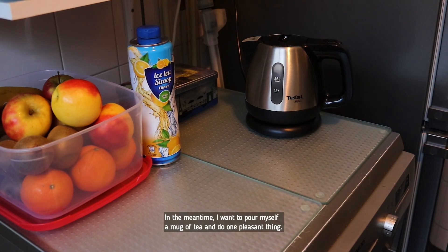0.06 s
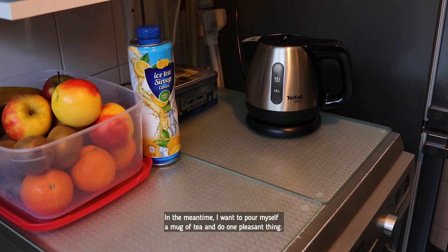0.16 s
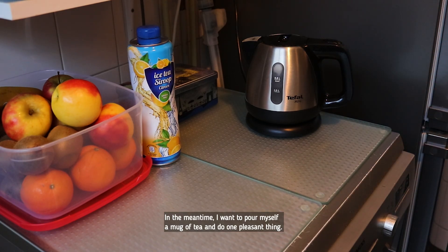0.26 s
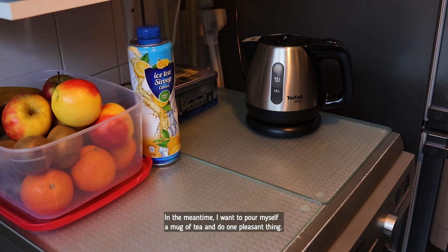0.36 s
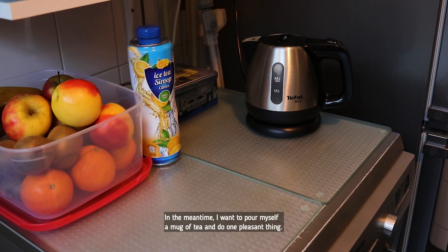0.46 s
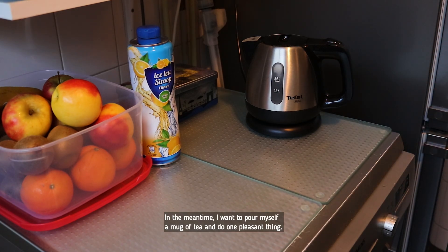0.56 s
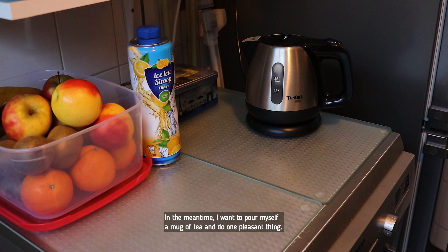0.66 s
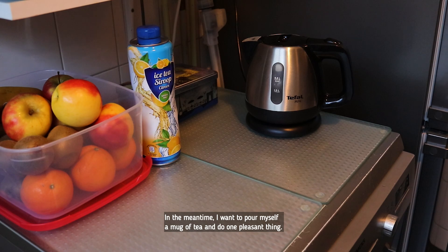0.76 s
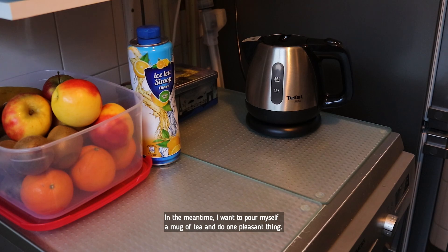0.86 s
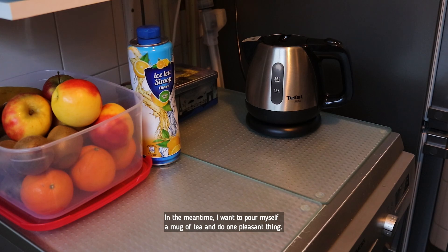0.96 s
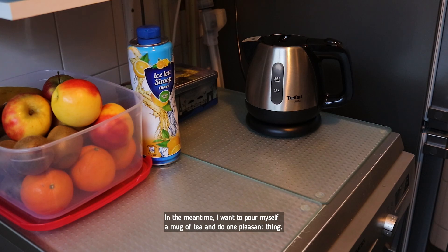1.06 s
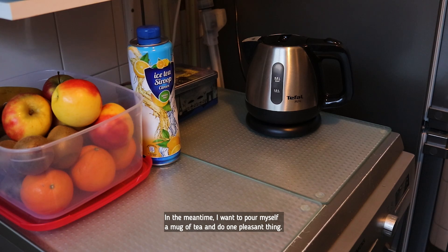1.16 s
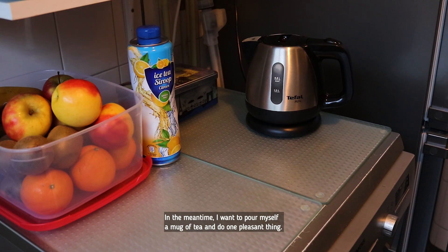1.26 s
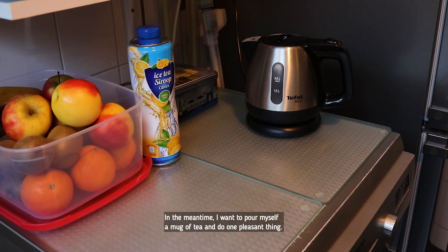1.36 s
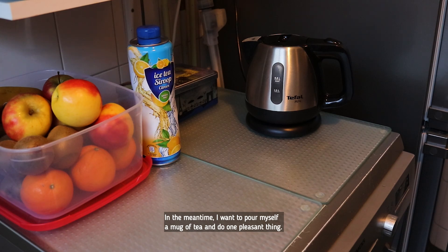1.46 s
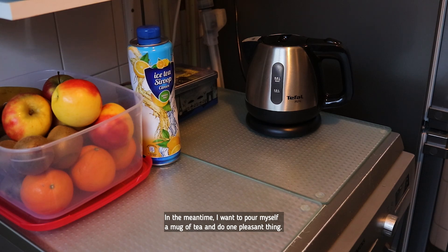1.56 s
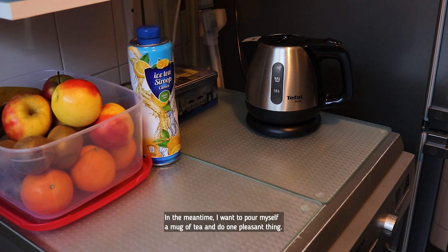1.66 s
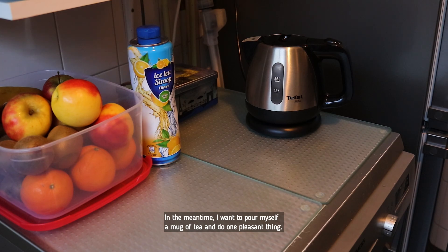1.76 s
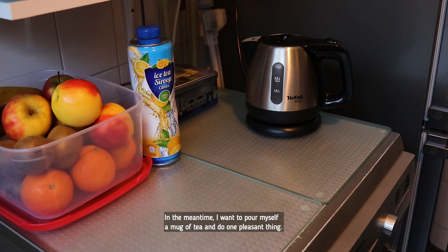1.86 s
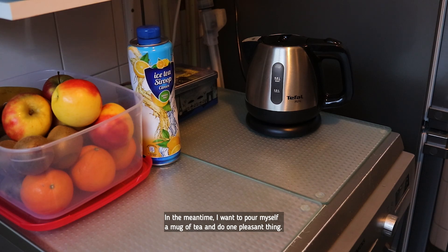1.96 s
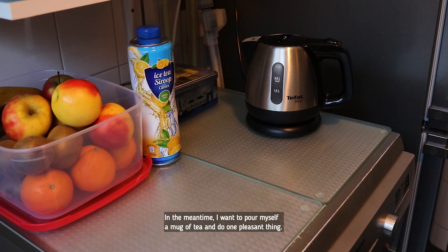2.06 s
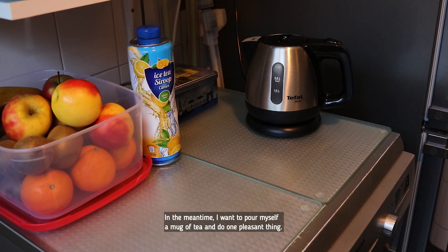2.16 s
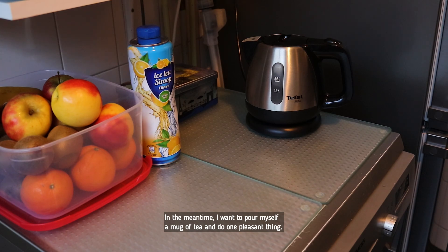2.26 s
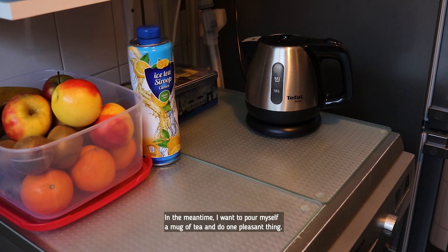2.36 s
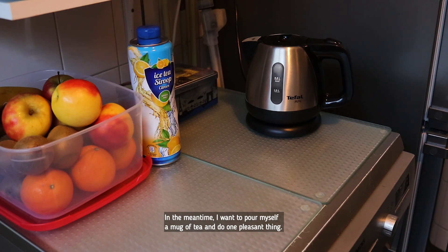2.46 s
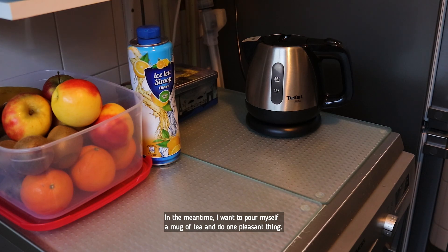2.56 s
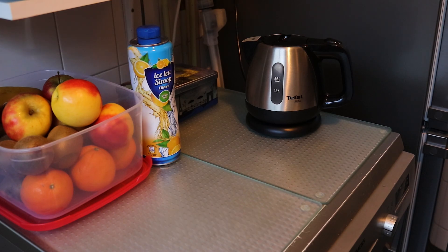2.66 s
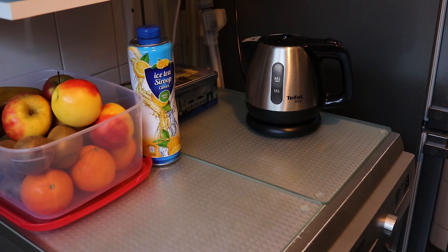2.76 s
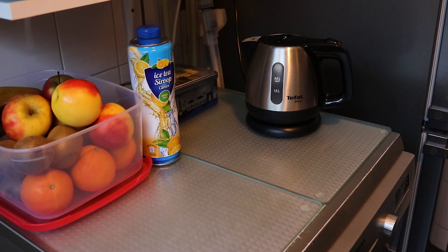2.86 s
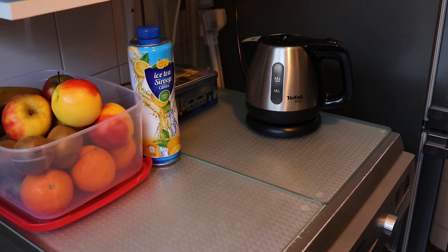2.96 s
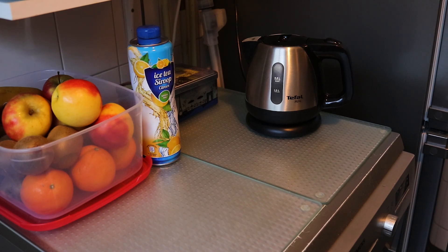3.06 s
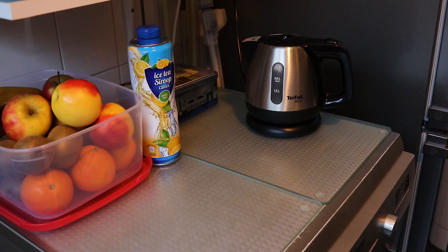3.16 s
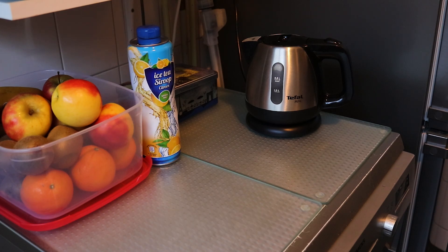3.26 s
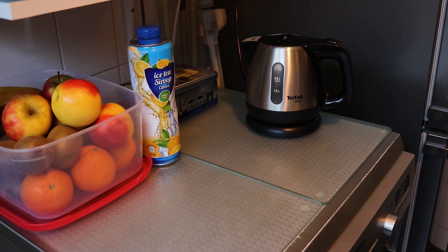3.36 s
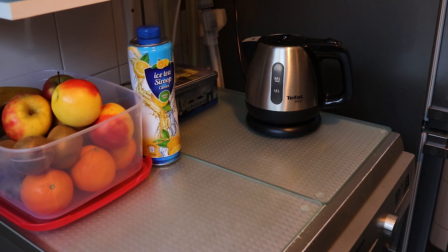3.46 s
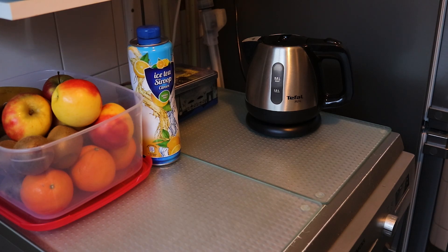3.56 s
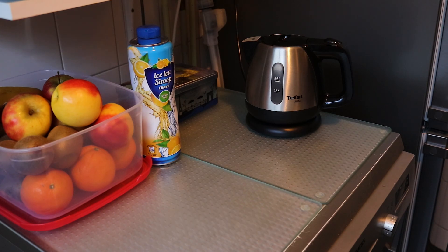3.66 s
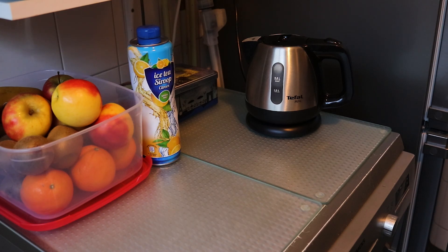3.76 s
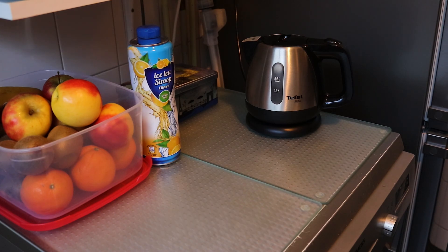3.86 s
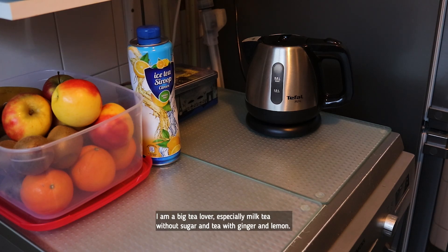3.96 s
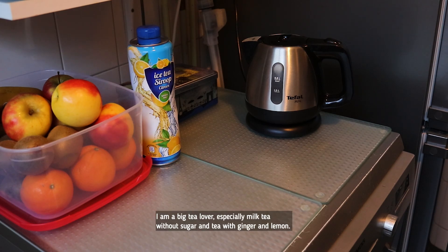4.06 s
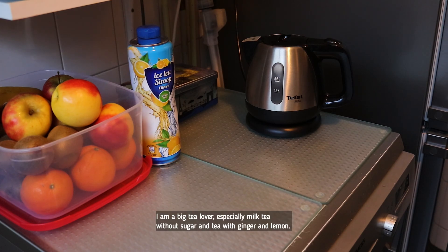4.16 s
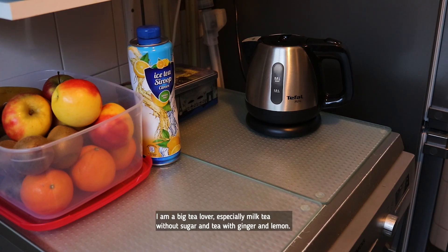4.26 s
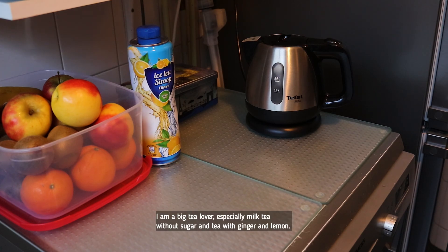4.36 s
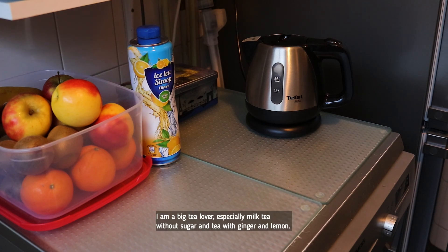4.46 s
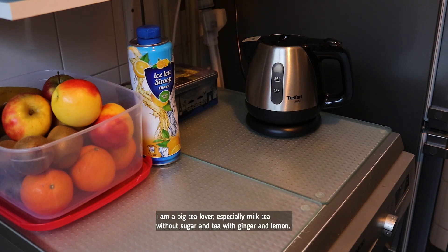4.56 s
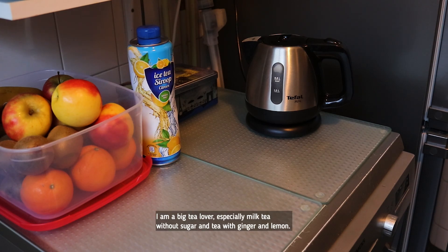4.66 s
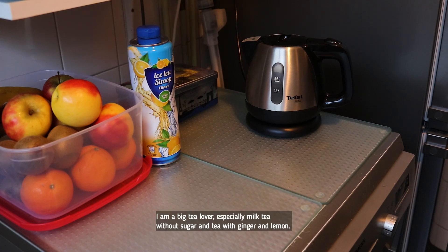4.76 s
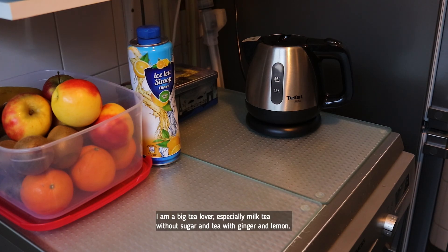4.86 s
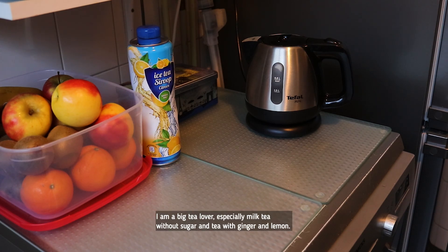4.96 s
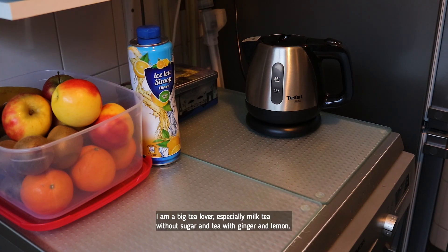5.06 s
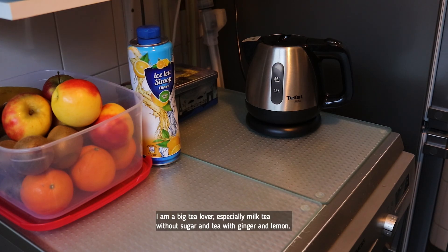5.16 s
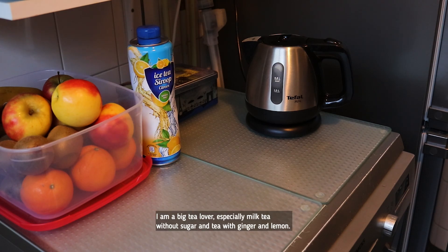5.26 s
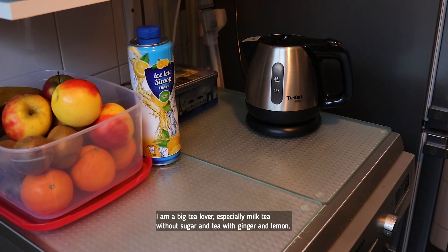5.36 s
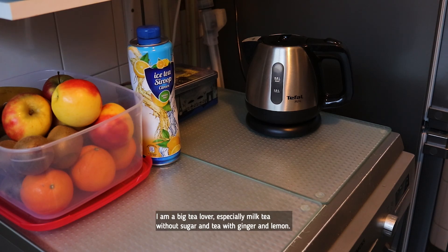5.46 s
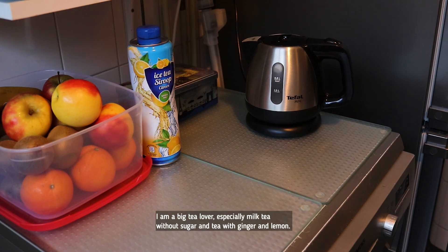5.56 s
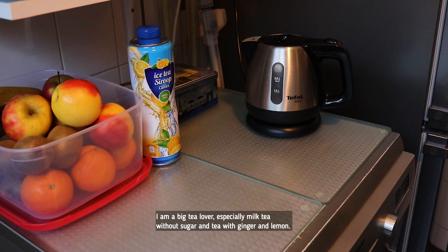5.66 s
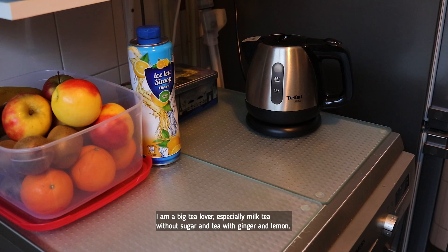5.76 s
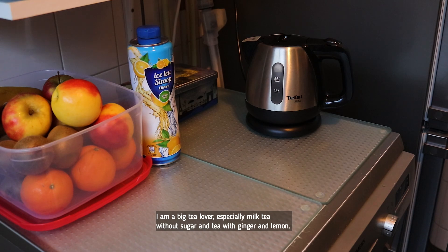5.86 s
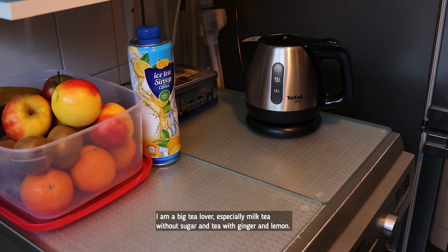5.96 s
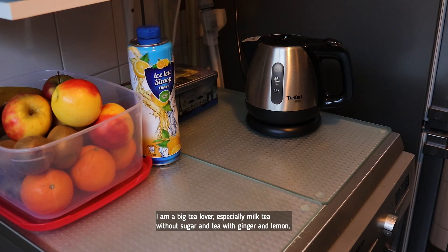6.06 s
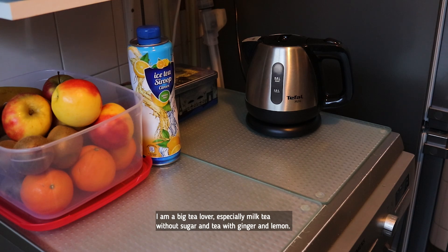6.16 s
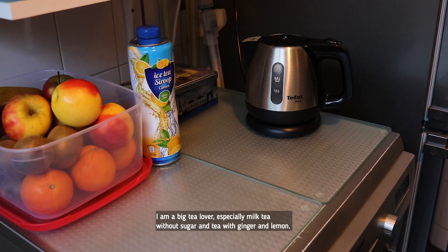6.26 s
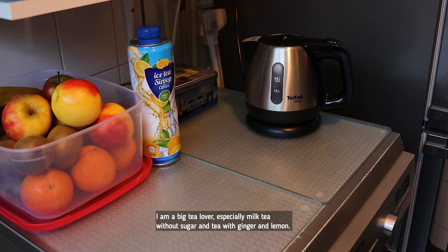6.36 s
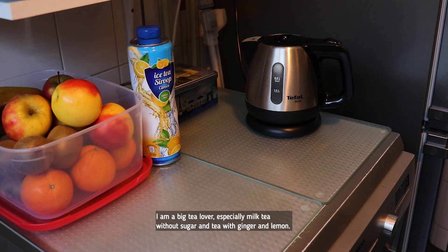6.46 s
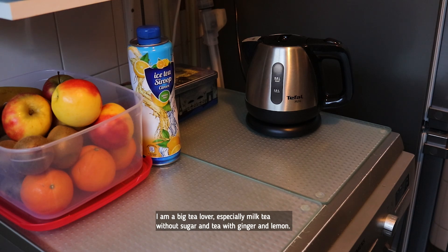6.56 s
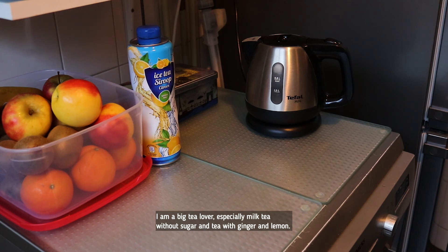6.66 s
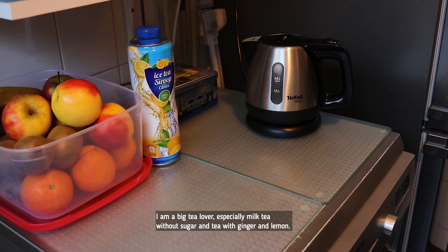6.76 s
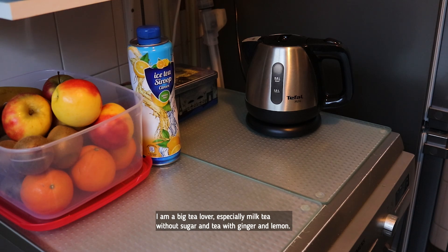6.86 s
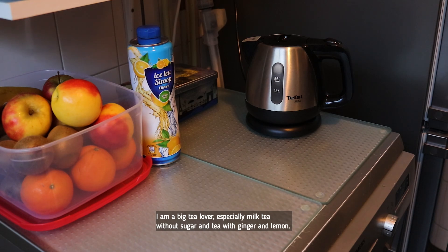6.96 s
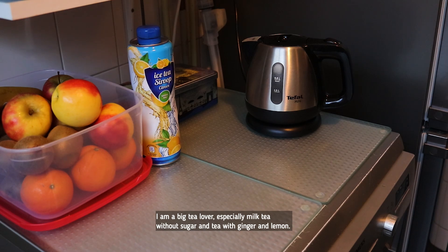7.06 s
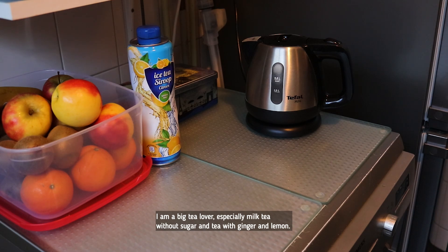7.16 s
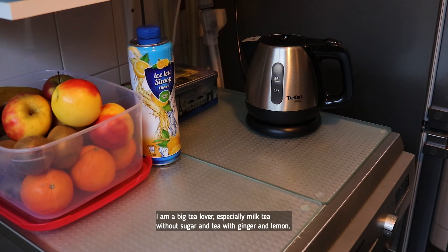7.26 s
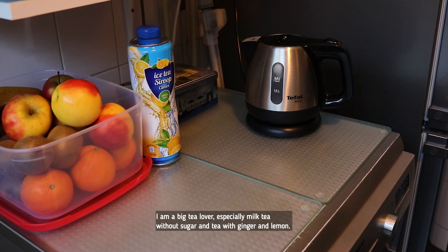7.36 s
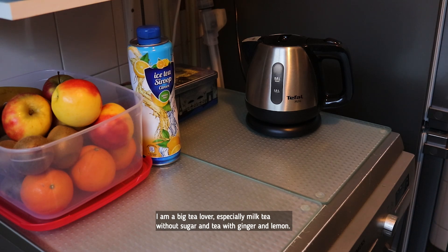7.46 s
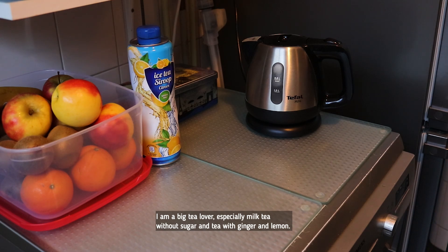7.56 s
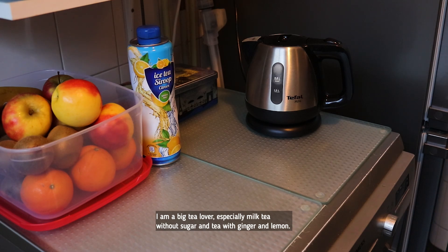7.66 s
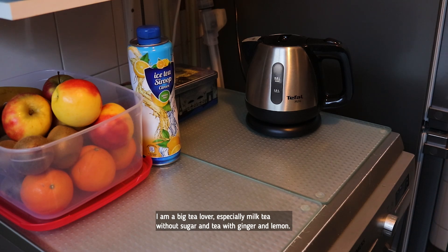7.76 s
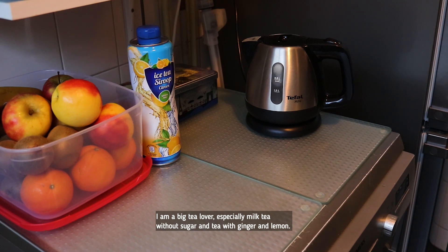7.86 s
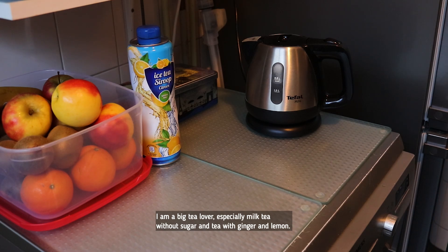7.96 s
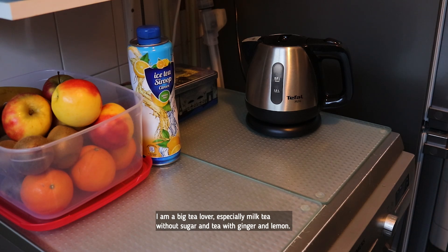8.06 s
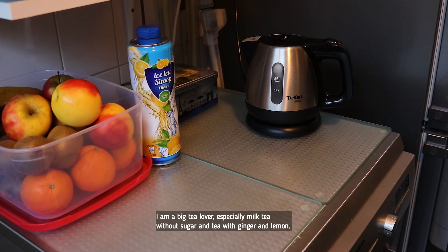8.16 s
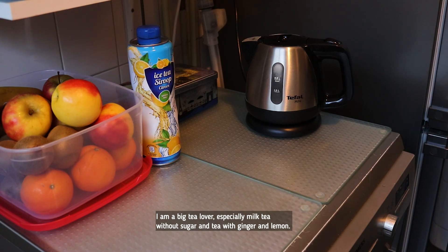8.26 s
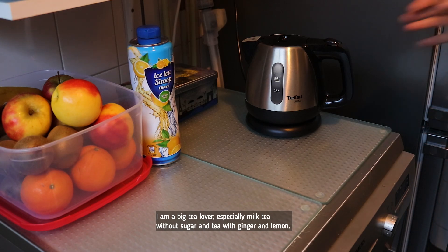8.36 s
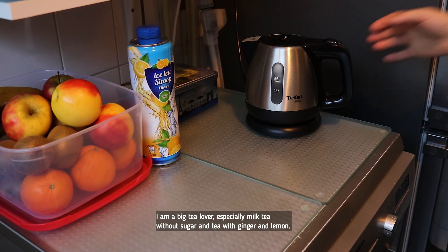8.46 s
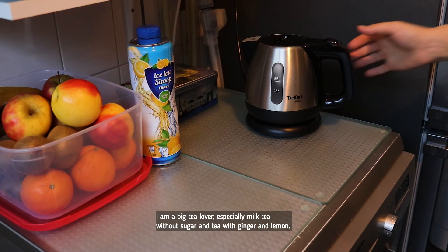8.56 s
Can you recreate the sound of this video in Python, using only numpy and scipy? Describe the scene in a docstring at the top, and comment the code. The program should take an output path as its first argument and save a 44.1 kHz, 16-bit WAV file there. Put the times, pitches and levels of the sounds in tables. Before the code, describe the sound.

From 0 s a steel electric kettle boils hard: dense, muffled bubbling around the low mids, with irregular round thumps, a deep watery churn and a light fizz of spray. At about 0.36 s the switch snaps off, a very loud, bright, dry clack in two almost fused steps, with a short knock, faint steel ring and tiled-room tail. Stored heat keeps the boil strong until about 2 s, then it sinks steadily; surface fizz fades sooner. Throughout, wet plinks and tiny hot-steel ticks scatter irregularly. Crisp cooling clicks fall near 1.0, 2.9, 5.4, 7.0 and 8.2 s, those at 5.4 and 8.2 clearest, with slight pings. By 6 to 8.5 s only soft, sparser blubs and ticks remain over a barely audible airy steam note, quiet room tone and faint hiss. Close, centred pickup with a short, lively kitchen reverberation.

```python
"""A steel electric kettle boils hard on a kitchen counter; its switch snaps off early and the boil slowly dies away.
Vapour bubbles thump the kettle's body as they collapse, and the churning water rumbles below.
Bursting bubbles ring the spout and plink, spray and hot steel tick, and steam adds a faint airy note.
The cooling kettle clicks five times. A tiled kitchen, made of fading noise, answers all of these except
the churning and the steam; a quiet room and a faint hiss lie underneath."""
import sys
import numpy as np
from scipy import signal
from scipy.fft import rfft, irfft
from scipy.io import wavfile

SR = 44100
rng = np.random.default_rng(int(sys.argv[2]) if len(sys.argv) > 2 else 0)


def waveform_to_disk(signal):
    """Save audio, clipped to [-1, 1], as 16-bit WAV at the path in sys.argv[1]."""
    frames = np.transpose(np.atleast_2d(signal))
    scaled = np.clip(frames, -1, 1) * 32767
    samples = np.round(scaled).astype(np.int16)
    wavfile.write(sys.argv[1], SR, samples)


N = 379701
T = np.arange(N) / SR  # time of every sample, in seconds


def amp(db):
    """Turns decibels into a gain."""
    return 10 ** (np.asarray(db) / 20)


def unit(x):
    """Scales a sound to an rms (average strength) of 1."""
    return x / np.sqrt(np.mean(x ** 2) + 1e-20)


def peaked(x):
    """Scales a sound so that its highest peak is 1."""
    return x / abs(x).max()


def read(points, hz):
    """Reads a table of values by pitch, joining its points on a log-frequency axis."""
    f, value = np.transpose(points)
    return np.interp(np.log(hz + 1), np.log(f + 1), value)


def add(mix, start_s, sound):
    """Mixes a sound in at its start time."""
    part = mix[max(round(start_s * SR), 0):][:len(sound)]
    part += sound[:len(part)]


def colour(x, spectrum, tilt_db=0, size=4096):
    """Filters with the given tone colour, tilted by so many dB an octave, without sounding early."""
    hz = abs(np.fft.fftfreq(size, 1 / SR))
    level_db = read(spectrum, hz) + tilt_db * np.log2(hz / 1000 + .1)
    log_gain = np.log(amp(level_db))
    # minimum phase: the filter answers as promptly as its colour allows
    response = np.fft.ifft(np.exp(np.conj(signal.hilbert(log_gain)))).real
    return signal.oaconvolve(x, response[:size // 2])[:len(x)]


def ring(modes, size=22050):
    """Adds up dying sine notes; fade_s is the time a note takes to fall by 60 dB."""
    t = T[:size]
    out = np.zeros(size)
    for pitch_hz, fade_s, level_db in modes:
        fade = np.exp(-np.log(1000) * t / fade_s)
        out += amp(level_db) * fade * np.sin(2 * np.pi * pitch_hz * t)
    return out


def blows(per_s, spread_db, limit):
    """Random pushes of either sign: many small, a few large."""
    when, sign, chance = rng.random((int(per_s * N / SR), 3)).T
    strength_db = spread_db * np.minimum(-np.log(1 - chance), limit)
    push = np.sign(sign - .5) * amp(strength_db)
    return np.bincount((when * N).astype(int), push, N)


def surge(depth_db, clump_s):
    """Bubbles come in clumps: a gain of rms 1 that wanders at random within bounds."""
    knots = rng.standard_normal(2000)
    wander = np.interp(T / clump_s, np.arange(len(knots)), knots)
    return unit(amp(depth_db * np.tanh(wander)))


def burst(decay_s, scatter, size=2048):
    """A sharp push followed by its scatter off the counter and nearby things, of energy 1."""
    scattered = scatter * rng.standard_normal(size) * np.exp(-T[:size] / decay_s)
    x = scattered + signal.unit_impulse(size)
    return x / np.linalg.norm(x)


def bubble(hz, cycles, glide, size=2048):
    """A bubble swells for some cycles of its note, then dies; a glide above 0 makes its pitch rise."""
    u = T[:size] * hz / cycles  # reaches 1 when the note is loudest
    pitch_hz = hz * (1 + glide * np.tanh(u - 1))
    return u * np.exp(1 - u) * np.sin(2 * np.pi * np.cumsum(pitch_hz) / SR)


# the heater cuts out (s)
SWITCH_OFF_S = 0.35


def cooling(hold_s, fade_db_per_s):
    """Gain of the boil: stored heat sustains it for a while after the switch trips, then it falls steadily."""
    return amp(-fade_db_per_s * np.maximum(T - SWITCH_OFF_S - hold_s, 0))


# the bubbling before it fades: rms level (dB), how long stored heat holds it (s), its fall after that (dB/s)
BOIL_DB, BOIL_HOLD_S, BOIL_FADE_DB_PER_S = -46.5, 1.59, 1.47
# what one collapsing bubble sounds like through the body: (pitch_hz, level_db)
BODY_COLOUR = [(200, -38), (262, -19), (290, -4), (318, -6.5), (355, -1.5), (455, -1), (485, -1.5),
               (520, 2.5), (600, -4.5), (720, -8.5), (800, -9.5), (875, -10.5), (1000, -23), (1500, -23.5),
               (3000, -63)]


def crowd():
    """Countless small vapour bubbles collapse over the hot plate and shake the body."""
    collapses = blows(800, 3.14, 2.9) * surge(2.5, clump_s=.055)
    bubbles = colour(collapses, BODY_COLOUR)
    in_room = unit(bubbles + amp(-8.0) * kitchen(bubbles))
    return amp(BOIL_DB) * cooling(BOIL_HOLD_S, BOIL_FADE_DB_PER_S) * in_room


# each large collapse also knocks a higher note of the body: pitch, and level against the main note
UPPER_HZ, UPPER_DB = 860, -18
# large vapour bubbles that collapse, levels before a slight final cut: (start_s, level_db, pitch_hz)
LARGE_BUBBLES = [(0.101, -32.5, 420), (.197, -30, 525), (.212, -29.5, 440), (.261, -31.5, 424),
                 (.326, -34, 480), (.466, -44, 484), (0.561, -33, 430), (0.57, -36.5, 480),
                 (.589, -39, 486), (0.731, -32, 497), (0.76, -30.5, 520), (0.779, -30, 515),
                 (.791, -34, 447), (.828, -35, 474), (.882, -35, 454), (1.11, -33, 470), (1.232, -35, 405),
                 (1.26, -32, 510), (1.316, -37, 465), (1.424, -36.5, 536), (1.494, -40, 540),
                 (1.574, -36, 425), (1.732, -31.5, 453), (1.863, -37, 480), (2.067, -44, 476),
                 (2.232, -37, 505), (2.344, -36, 433), (2.363, -32, 516), (2.393, -30.5, 480),
                 (2.492, -30, 448), (2.619, -38, 470), (2.666, -38, 487), (2.685, -34, 430),
                 (2.808, -35.5, 473), (2.864, -34.5, 450), (2.922, -34, 452), (3.031, -33, 546),
                 (3.192, -34, 448), (3.267, -37.5, 486), (3.432, -35.5, 494), (3.453, -39, 483),
                 (3.567, -35, 403), (3.588, -36, 537), (3.606, -33.5, 526), (3.702, -42, 480),
                 (3.746, -38.5, 462), (4.035, -38, 503), (4.051, -41, 465), (4.087, -40, 484),
                 (4.122, -40, 460), (4.176, -42, 527), (4.233, -47, 490), (4.273, -34.5, 440),
                 (4.355, -35, 495), (4.558, -41, 470), (4.679, -37, 447), (4.747, -35.5, 506),
                 (4.89, -36.5, 510), (5.003, -33.5, 514), (5.073, -36.5, 490), (5.103, -36.5, 555),
                 (5.207, -39.5, 446), (5.229, -40, 500), (5.262, -37, 670), (5.275, -38, 477),
                 (5.431, -36.5, 465), (5.457, -39, 567), (5.493, -41, 410), (5.822, -41, 557),
                 (5.868, -41, 480), (6.098, -37.5, 514), (6.112, -40, 486), (6.424, -37, 564),
                 (6.45, -43, 514), (6.624, -40.5, 390), (6.656, -39.5, 497), (6.876, -40, 493),
                 (6.893, -40, 503), (7.028, -41, 534), (7.058, -36.5, 505), (7.15, -37, 626),
                 (7.215, -39, 454), (7.272, -41, 494), (7.369, -40.5, 513), (7.532, -44, 490),
                 (7.748, -41, 530), (7.771, -37.5, 500), (8.057, -39.5, 560), (8.088, -41, 528),
                 (8.316, -46, 461), (8.352, -43.5, 524), (8.413, -41, 477), (8.448, -40.5, 507)]


def thumps():
    """Large vapour bubbles collapse one by one, each thumping a low and a higher note of the body."""
    large = np.zeros(N)
    for start_s, level_db, pitch_hz in LARGE_BUBBLES:
        low = bubble(pitch_hz, 0.73, 0.014)
        high = amp(UPPER_DB) * bubble(UPPER_HZ, 1.2, 0)
        add(large, start_s, -amp(level_db) * (low + high))
    return amp(-0.5) * (large + amp(-9.5) * kitchen(large))


# the churning before it fades: rms level (dB), hold (s), fall (dB/s)
CHURN_DB, CHURN_HOLD_S, CHURN_FADE_DB_PER_S = -52, 1.9, 2
# colour of the churning water: (pitch_hz, level_db)
CHURN_COLOUR = [(20, -30), (35, -21.5), (52, -14.5), (96, -16.5), (120, -8), (135, 1.5), (152, -5),
                (175, -6), (207, -0.5), (235, -3), (268, -28), (400, -21.5), (1000, -65)]


def churning():
    """The whole body of water churns: clumped random pushes, filtered to a low rumble."""
    pushes = blows(900, 1.16, 2.1) * surge(2.6, clump_s=.09)
    churn = unit(colour(pushes, CHURN_COLOUR))
    return amp(CHURN_DB) * cooling(CHURN_HOLD_S, CHURN_FADE_DB_PER_S) * churn


# resonances of the air over the water and of the spout: (pitch_hz, swelling_cycles, level_db)
SPOUT_NOTES = [(1339, 6.2, -2.5), (2050, 1.6, 3), (2130, 3.8, 3), (2570, 2.6, -6.5)]


def pops(detune=0.041, count=5):
    """Larger bursts each sound one resonance of the kettle for a few cycles; heaving water shifts its pitch."""
    out = np.zeros(N)
    for pitch_hz, cycles, level_db in SPOUT_NOTES:
        for shift in 1 + detune * np.linspace(-1, 1, count):
            note = bubble(pitch_hz * shift, cycles, 0.018)
            out += amp(level_db) * signal.oaconvolve(blows(16, 5.3, 2.1), note)[:N]
    return out


# colour of the spray, also used for prickling and ticks on the steel: (pitch_hz, level_db)
SPRAY_COLOUR = [(500, -11.5), (1000, 2.5), (1700, -0.5), (2600, 0.5), (3600, -3.5), (4400, -2.5),
                (5300, -8), (6200, -13.5), (7000, -14), (8000, -9), (9000, -15), (10500, -22),
                (16000, -46.5)]


def spray(count=24):
    """Tiny bubbles of all sizes burst: each gives a rough blip of a few cycles."""
    out = np.zeros(N)
    for hz in np.geomspace(900, 10000, count):
        blip = signal.fftconvolve(bubble(hz, 0.44, 0.051, size=512), burst(0.007, 0.087, size=512))
        blip *= np.sqrt(hz) / np.linalg.norm(blip)
        out += signal.oaconvolve(blows(24, 6.5, 3.47), blip)[:N]
    return colour(out, SPRAY_COLOUR)


def prickle():
    """Fine spray strikes the steel in many tiny sharp impacts."""
    impacts = signal.oaconvolve(blows(80, 9.0, 2.4), burst(0.0029, 0.25))[:N]
    return colour(colour(impacts, SPRAY_COLOUR), [(800, -6.5), (3000, 4.0)])


# bursting at the surface: hold (s), fall (dB/s)
SURFACE_HOLD_S, SURFACE_FADE_DB_PER_S = 0.13, 1.43


def surface():
    """Bubbles burst in clumps, ringing the spout and throwing a fine spray that prickles on the steel."""
    activity = cooling(SURFACE_HOLD_S, SURFACE_FADE_DB_PER_S)
    clumps = activity * surge(1.9, clump_s=.06)
    popping = amp(-64.5) * clumps * unit(pops())
    fizz = amp(-69.5) * clumps * unit(spray())
    # the prickle fades more slowly than the boil
    prickling = amp(-74) * activity ** 0.42 * unit(prickle())
    into_room = amp(-7) * popping + amp(-3.5) * (fizz + prickling)
    return popping + fizz + prickling + kitchen(into_room)


# bubbles and droplets that burst, levels before the final tone; the row at 1.0105 s instead adds a low note to
# the cooling click at that moment: (start_s, level_db, pitch_hz, swelling_cycles)
SINGLE_BURSTS = [(.174, -51, 2060, 5.2), (0.326, -49.5, 2130, 6.6), (.674, -44.5, 6640, 1.2),
                 (.792, -49.5, 2120, 2.6), (.866, -48.5, 2120, 3), (.924, -55, 2030, 3),
                 (1.0105, -39.5, 940, 0.6), (1.307, -46, 840, 1.3), (1.408, -44, 865, 1.5),
                 (1.493, -53, 1290, 2.3), (1.494, -51, 2030, 3), (1.753, -56, 2290, 3),
                 (2.224, -56, 2125, 3), (2.507, -56, 2233, 3), (2.557, -52, 2080, 3), (2.742, -54, 2110, 3),
                 (3.343, -60, 2100, 3), (3.75, -54, 2140, 2.6), (1.6882, -42, 2140, 2.2),
                 (2.0185, -45, 6600, 1.7), (2.2619, -50, 2150, 5.4), (2.5402, -50.5, 2100, 2.2),
                 (2.421, -50, 2280, 1.5), (2.9859, -41.5, 900, 1.5), (2.686, -53, 2350, .9),
                 (3.192, -45, 2060, 0.97), (3.262, -55, 7400, 2.4), (3.266, -51, 2140, 2.9),
                 (3.327, -44, 2135, 4.5), (3.6115, -41.5, 1020, 0.72), (3.8932, -49.5, 2130, 3.9),
                 (3.911, -49, 900, 1.1), (4.062, -54, 2230, 2.7), (4.6933, -46.5, 1090, 0.49),
                 (4.6988, -51.5, 2140, 4.6), (4.6993, -57, 7300, 4), (4.733, -45, 920, 0.64),
                 (4.95, -53, 2130, 3), (5.081, -49, 890, 1.4), (5.166, -51, 990, 0.87),
                 (5.371, -41, 820, 1.1), (5.753, -47, 920, 0.63), (6.1291, -58, 7640, 3.5),
                 (6.273, -52, 1180, 0.9), (6.612, -55.5, 2243, 3), (6.681, -60, 2200, 3),
                 (7.07, -59, 2280, 3), (7.316, -47, 2500, 1.1), (7.512, -57, 2230, 3),
                 (6.697, -54.5, 7600, 1.7), (6.83, -49.5, 1100, 0.86), (7.1517, -48.5, 2290, 1.9),
                 (7.18, -59, 2500, 1.8), (7.771, -49.5, 1030, 0.46), (8.342, -58, 2190, 3.4),
                 (8.377, -59, 954, 1.1), (8.386, -62, 2174, 4), (8.551, -51.5, 1560, 0.9)]


def plinks():
    """Single bubbles break with a soft wet splash and a short note; the tiles throw back the high ones most."""
    notes, splashes = np.zeros((2, N))
    for start_s, level_db, hz, cycles in SINGLE_BURSTS:
        around_note = [(hz / 3, -22), (hz * 0.31, -10), (hz, 0), (hz * 2, -14), (hz * 6, -40)]
        splash = colour(burst(0.006, 0.2), around_note)
        add(notes, start_s, amp(level_db) * bubble(hz, cycles, 0.0049))
        add(splashes, start_s, amp(level_db) * peaked(splash))
    out = colour(notes + amp(-1.5) * splashes, [(4000, 1), (8000, 3), (12000, -1)])
    return out + kitchen(colour(out, [(2200, -10), (6500, -4.0)]))


# ticks of hot steel and of spray on it, before the final tone: (start_s, level_db, brightness_db_per_octave)
STEEL_TICKS = [(0.1513, -44, -5.5), (.674, -53, 6), (.748, -50, 3), (0.8287, -43, -4.5), (0.8437, -48, 5.5),
               (0.856, -46, -4), (.912, -39, -10.5), (0.9265, -45, -6.5), (1.085, -55, -4), (1.114, -61, 6),
               (1.367, -50.5, -1), (1.777, -49.5, 1), (2.049, -54, -2), (2.483, -58, -2),
               (1.6077, -51.5, 4), (1.6974, -41.5, -3), (1.828, -55, 0), (2.0017, -45, -4.5),
               (2.0185, -53, 3), (2.159, -49, 0), (2.319, -50.5, 2), (2.3355, -46.5, -2.5),
               (2.3714, -50.5, 2.5), (2.4497, -49, -3), (2.624, -49, -1), (2.678, -46.5, 0),
               (2.686, -55, -3), (3.1683, -54, 5), (3.19, -52, 1), (3.3249, -57, -7), (3.4775, -52, 5),
               (3.845, -45.5, -6), (3.898, -60, 15), (3.976, -60, 7), (4.2914, -56, 4), (4.34, -49.5, -3),
               (4.3797, -55, 3.5), (4.421, -57, 6), (4.542, -46.5, -4.5), (4.6265, -49, 0.5),
               (4.8816, -51, 2), (5.01, -47.5, 0), (5.2252, -49.5, -3), (5.262, -45.5, -3.5),
               (5.6323, -47.5, -3), (5.739, -56, -2), (5.933, -56, -5), (5.6851, -46.5, -6),
               (5.8895, -48.5, -1), (6.085, -50.5, 0), (6.118, -47.5, -5.5), (6.298, -47, -6.5),
               (6.417, -58, 4), (6.682, -54, -1), (6.4868, -47, -2.5), (6.6552, -48, -3),
               (6.8108, -51, 1.5), (7.316, -48.5, 0), (7.3637, -44.5, -1.5), (7.445, -54, -3),
               (7.4803, -50, -4), (7.6262, -47.5, -4), (7.715, -56, 1), (7.789, -57, 1),
               (7.8846, -55.5, -1), (7.9923, -51.5, -1), (8.126, -57, -1)]


def ticks():
    """Small sharp ticks on the steel, too light to move the body."""
    out = np.zeros(N)
    for start_s, level_db, tilt_db in STEEL_TICKS:
        tick = colour(burst(0.0052, 0.14), SPRAY_COLOUR, tilt_db)
        add(out, start_s, amp(level_db) * peaked(tick))
    out = colour(out, [(200, -26.5), (1200, 5.0)])
    return out + amp(-4.5) * kitchen(out)


def rattle(decay_s, size=2048):
    """A contact chatters for an instant: a dense burst of energy 1, from noise made equally strong at all pitches."""
    z = rfft(rng.standard_normal(size) * np.exp(-T[:size] / decay_s))
    x = irfft(z / abs(z))[:size // 2]
    return x / np.linalg.norm(x)


# the body answers a crack after (s)
KNOCK_LAG_S = 0.00179
# colour of a snap once the tiles have thrown it back from all sides: (pitch_hz, level_db)
TAIL_COLOUR = [(300, -25), (700, -6), (1050, 5), (1300, 2.5), (1550, 4.5), (2100, -1.5), (2600, -0.5),
               (3200, -4.5), (4000, -7), (5000, -4), (6000, -9), (7300, -9), (8700, -10), (10500, -18.5),
               (14000, -20)]
# single echoes of a snap off the tiles and a far wall: (delay_s, level_db)
SNAP_ECHOES = [(.0075, -17), (0.041, -34)]


def snaps(rows, spectrum, body, ringing, chatter_s, knock_room_db, tail_tilt_db):
    """A snapping contact cracks at once; the body knocks a moment later and the steel rings on."""
    near, into_room = np.zeros((2, N))
    for start_s, crack_db, tilt_db, knock_db, ring_db, room_db in rows:
        soft_start = 1 - np.exp(-T[:22050] / .001)
        knock = amp(knock_db) * peaked(ring(body) * soft_start)
        crack = amp(crack_db) * colour(rattle(chatter_s), spectrum, tilt_db)
        add(near, start_s, crack)
        add(near, start_s + KNOCK_LAG_S, knock + amp(ring_db) * ring(ringing))
        # the room hears the crack from all sides, so its tail is even
        tail = colour(signal.unit_impulse(2048), TAIL_COLOUR, tilt_db + tail_tilt_db)
        add(into_room, start_s, amp(room_db) * tail)
        add(into_room, start_s + KNOCK_LAG_S, amp(knock_room_db) * knock)
    out = near + kitchen(into_room)
    for delay_s, level_db in SNAP_ECHOES:
        add(out, delay_s, amp(level_db) * near)
    return out


# the switch trips, then hits its stop:
# (start_s, crack_db, brightness_db_per_octave, knock_db, ring_db, room_db)
SWITCH_SNAPS = [(0.3605, -15, 0, -42, -66, -12), (0.3662, -2.5, -0.25, -17, -41.5, 0.5)]
# colour of the switch's crack: (pitch_hz, level_db)
CRACK_COLOUR = [(300, -37), (900, -4), (1400, 9), (2000, 8), (2250, 2), (2700, 11), (3050, 4), (3400, -6),
                (3750, 9.5), (4000, 10), (4250, -1), (4700, -3), (5000, 7), (5500, -1), (6200, -15),
                (7200, -3.5), (8400, 4.5), (9200, -8.5), (12500, -8), (16000, -14)]
# notes of the housing round the switch: (pitch_hz, fade_s, level_db)
HOUSING_NOTES = [(860, 0.025, -7), (1120, 0.023, 8), (1270, 0.022, 5), (1490, 0.032, 0), (1830, 0.025, 0),
                 (2690, 0.022, -9)]
# the steel wall rings on faintly after the switch: (pitch_hz, fade_s, level_db)
WALL_NOTES = [(1000, 0.42, 0), (1040, 0.4, 0), (1480, 0.28, -13), (1715, 0.38, -13), (1975, 0.41, -5),
              (2520, .3, -18), (2675, 0.29, -20)]


def switch():
    """The switch snaps in two quick steps that knock its housing and leave the steel wall ringing."""
    return snaps(SWITCH_SNAPS, CRACK_COLOUR, HOUSING_NOTES, WALL_NOTES,
                 chatter_s=0.0026, knock_room_db=-23, tail_tilt_db=0)


# the cooling kettle clicks:
# (start_s, crack_db, brightness_db_per_octave, knock_db, ring_db, room_db)
COOLING_CLICKS = [(1.0098, -30, -1, -43, -70, -32), (2.9227, -28, -1, -47.5, -68, -24.5),
                  (5.3864, -23.5, 0.5, -32.5, -55, -18), (6.9576, -36.5, 1, -50, -74, -28.5),
                  (8.2429, -23.5, 0.5, -33.5, -56, -21)]
# colour of a cooling click: (pitch_hz, level_db)
CLICK_COLOUR = [(300, -43), (900, -25), (1300, -5), (2050, 10), (2300, 6.5), (2900, 10), (3450, -1),
                (4150, 8.5), (4700, -2), (5600, 1), (6300, 0.5), (7600, 4), (8300, 5), (9200, -3.5),
                (12500, -6.5), (16000, -15)]
# notes of the shell that a cooling click knocks: (pitch_hz, fade_s, level_db)
SHELL_NOTES = [(1170, 0.026, 1), (1290, 0.018, 6), (1530, 0.015, 13.5), (1750, 0.024, 0), (2030, 0.02, -5)]
# the hot plate pings as it shrinks: (pitch_hz, fade_s, level_db)
PLATE_NOTES = [(1340, 0.27, -2), (1433, 0.2, 0), (4180, 0.17, -6), (4240, 0.18, -4.5), (4680, 0.09, -10),
               (5800, 0.12, -7)]


def cooling_clicks():
    """The cooling kettle clicks: each click knocks the shell and makes the shrinking hot plate ping."""
    return snaps(COOLING_CLICKS, CLICK_COLOUR, SHELL_NOTES, PLATE_NOTES,
                 chatter_s=0.0015, knock_room_db=-19.5, tail_tilt_db=0.6)


# steam note: rms level once the lid has filled (dB), its rise until then (dB/s), time when it is full (s)
STEAM_DB, STEAM_RISE_DB_PER_S, STEAM_FULL_S = -76, 0.5, 6.5


def steam(hz=3300, width_hz=230):
    """Steam leaves through the lid in uneven puffs, with a faint airy note that grows, then holds."""
    # noise driving one quickly dying note gives a breathy pitch
    note = signal.oaconvolve(rng.standard_normal(N), ring([(hz, 2.7 / width_hz, 0)]))[:N]
    level_db = STEAM_DB - STEAM_RISE_DB_PER_S * np.maximum(STEAM_FULL_S - T, 0)
    return amp(level_db) * surge(3.9, clump_s=0.072) * unit(note)


# how long the kitchen rings at each pitch, to fall by 60 dB: (pitch_hz, fade_s)
KITCHEN_FADE = [(150, 0.24), (600, 1), (1300, 0.6), (2500, 0.74), (4000, 0.52), (8000, 0.5), (15000, 0.24)]


def kitchen(x, size=30000):
    """The answer of the room: a dense noise tail after a short gap, each band dying at its own speed."""
    hz, t, z = signal.stft(rng.standard_normal(size), SR, nperseg=256)
    fade = np.exp(-np.log(1000) * t / read(KITCHEN_FADE, hz)[:, None])
    tail = signal.istft(z * fade, SR, nperseg=256)[1]
    tail *= 1 - np.exp(-(T[:len(tail)] / 0.0013) ** 2)
    return signal.oaconvolve(x, tail / np.linalg.norm(tail))[:N]


# colour of the still room: (pitch_hz, level_db)
STILL_COLOUR = [(20, -4), (100, 23.5), (500, 20), (1000, 14.5), (2000, 8.5), (3000, -4.5), (4500, 2),
                (6200, -2), (8000, 0), (10000, -6), (13000, -7), (16000, -9.5)]


def still_room():
    """The quiet room: steady noise, filtered to be strongest in the lows."""
    return amp(-63.5) * unit(colour(rng.standard_normal(N), STILL_COLOUR))


def scene():
    """The kettle stands straight ahead, in a quiet room: both channels carry the same sound."""
    boil = crowd() + thumps() + churning()
    bursts = surface() + plinks() + ticks()
    mono = boil + bursts + switch() + cooling_clicks() + steam() + still_room()
    return np.array([mono, mono])


# the steep filter removes everything above this pitch (Hz)
EDGE_HZ = 15800
# colour of a faint hiss, different in each channel: (pitch_hz, level_db)
HISS_COLOUR = [(20, 10), (80, 6), (130, -5), (450, -22), (1000, -21), (2500, -4), (5000, 6.5), (16000, 6)]


def record(dry):
    """Each channel adds its own hiss; then a steep filter removes everything above the band limit."""
    noises = rng.standard_normal((2, N))
    hiss = amp(-74.0) * unit(np.array([colour(noise, HISS_COLOUR) for noise in noises]))
    edge = signal.firwin(511, EDGE_HZ, window=("kaiser", 9), fs=SR)
    return signal.oaconvolve(dry + hiss, edge[None], "same")


dry = scene()
out = record(dry)
waveform_to_disk(out)
```